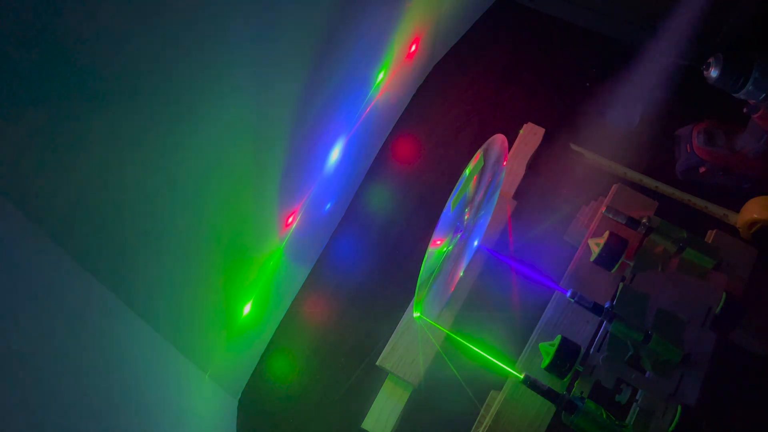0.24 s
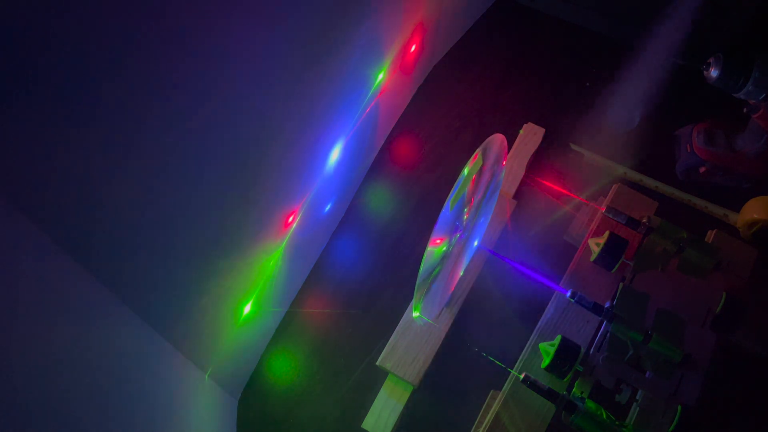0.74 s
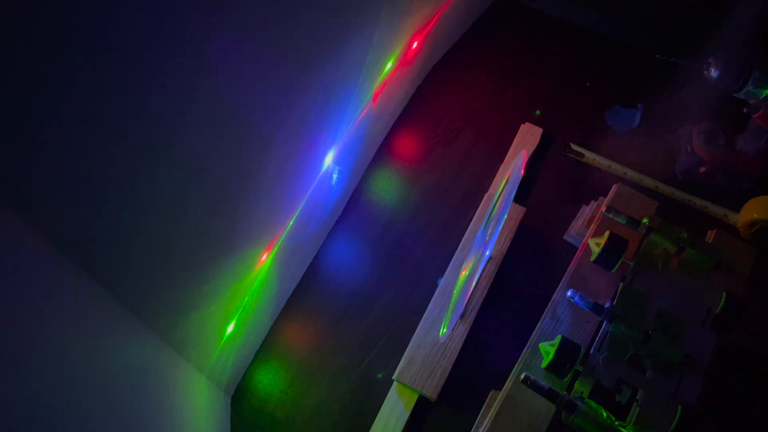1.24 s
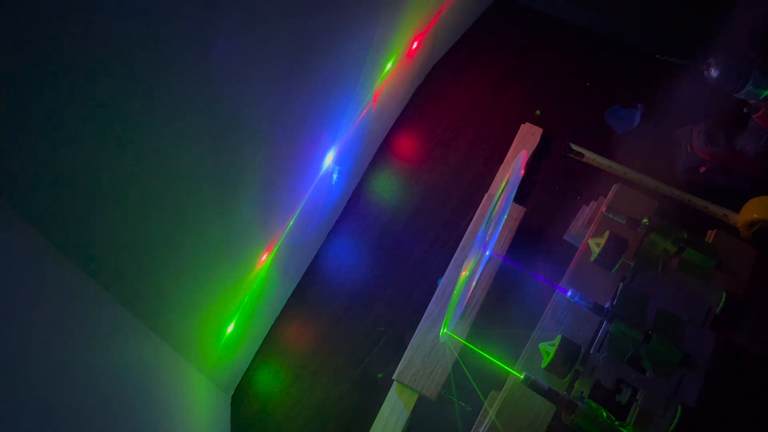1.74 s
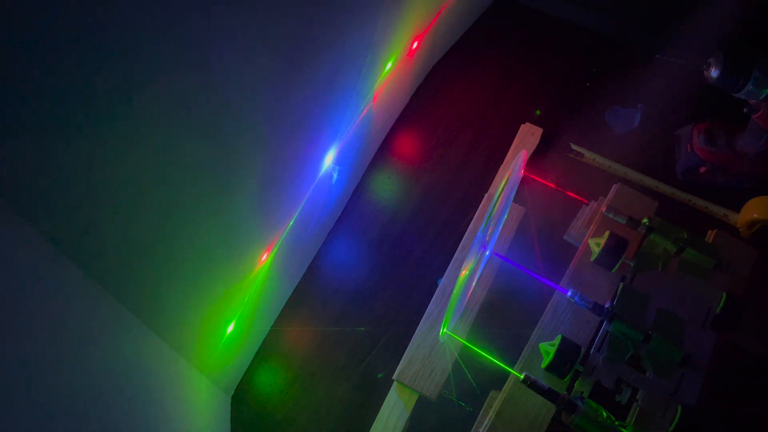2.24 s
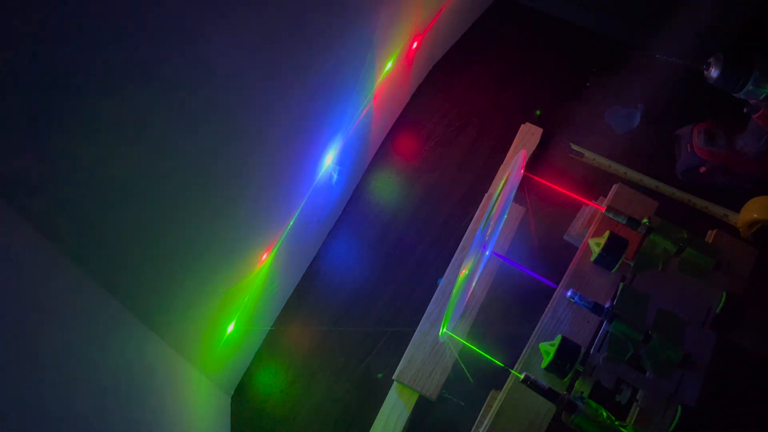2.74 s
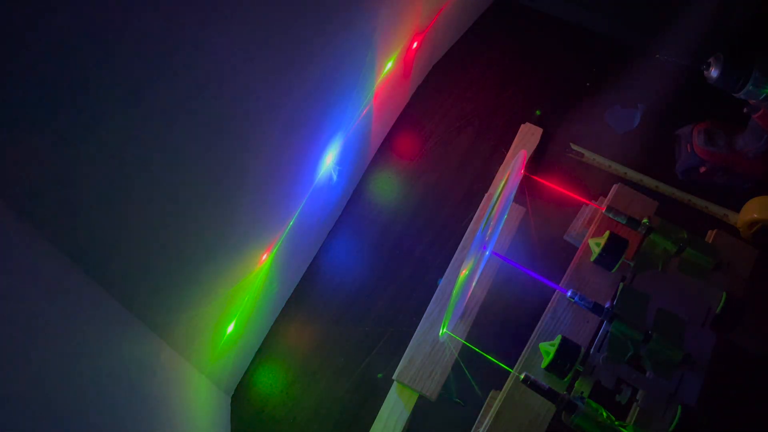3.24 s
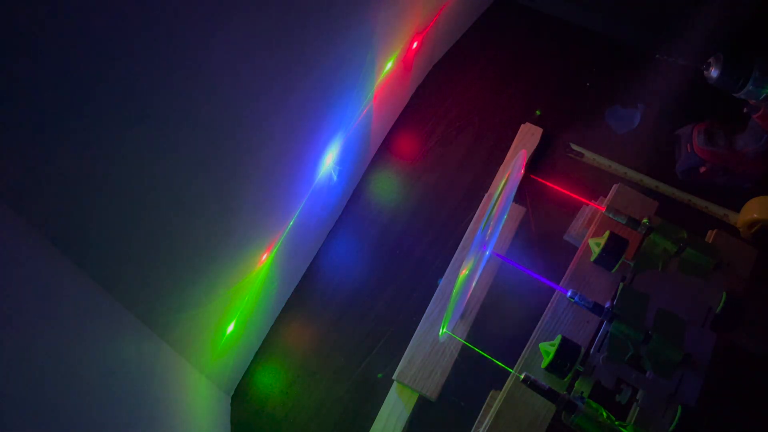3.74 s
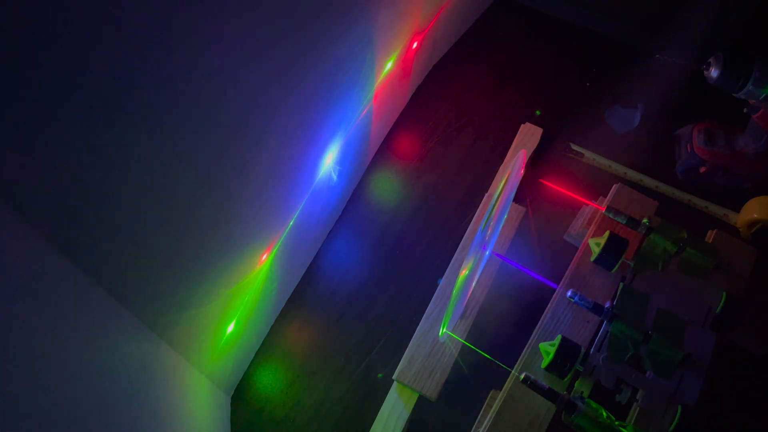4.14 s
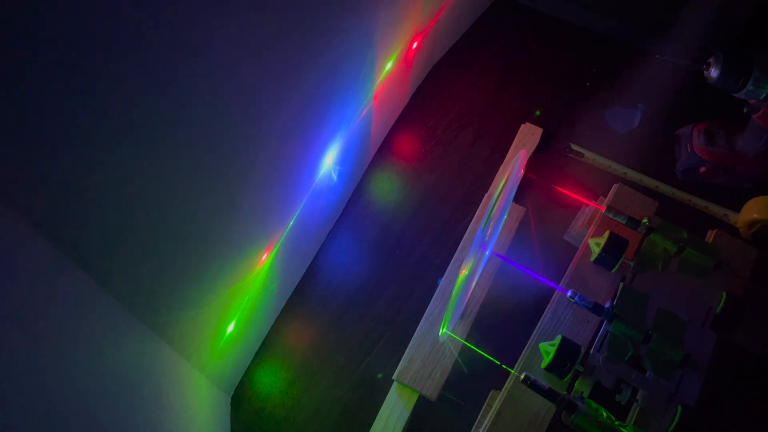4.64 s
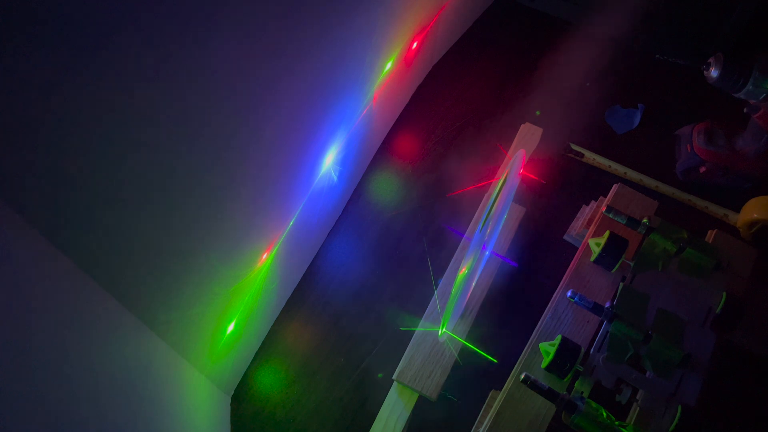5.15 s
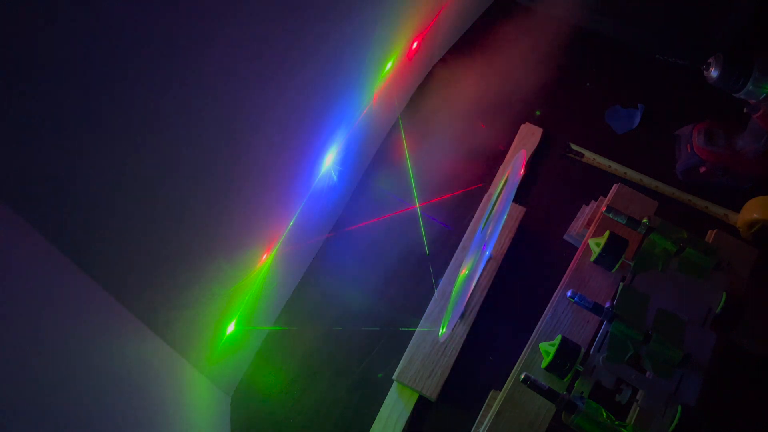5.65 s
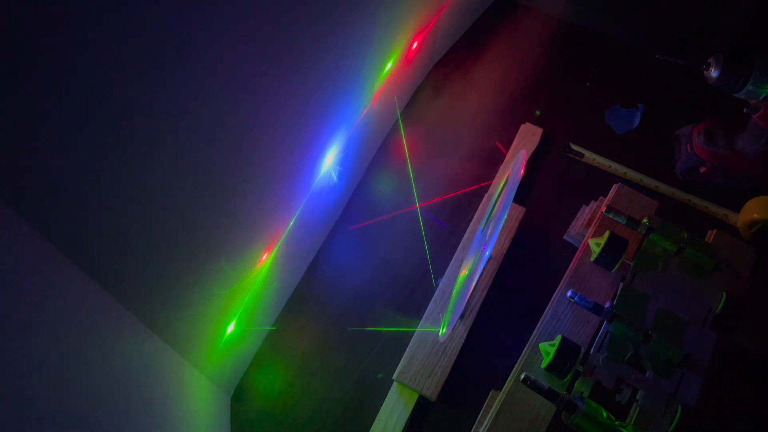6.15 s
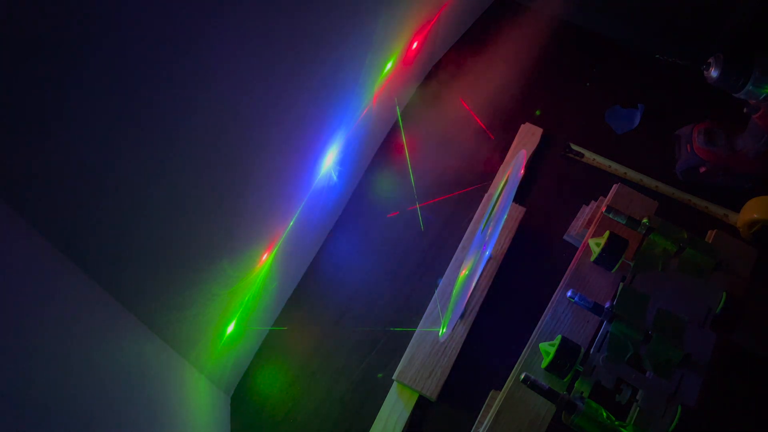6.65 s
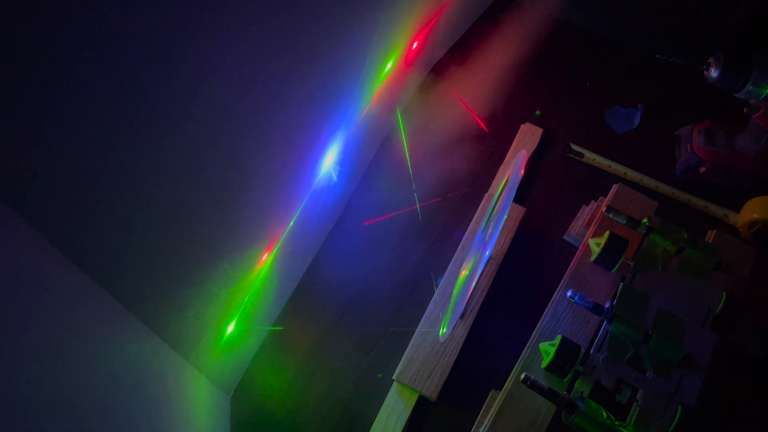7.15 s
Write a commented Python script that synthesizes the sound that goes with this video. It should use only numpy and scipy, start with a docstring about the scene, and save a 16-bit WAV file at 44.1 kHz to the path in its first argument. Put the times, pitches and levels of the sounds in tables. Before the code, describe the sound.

Close, steady steam jet with airy high hiss and soft fluttering rush, a few early low puffs, one sudden dip, faint hum behind.

```python
"""Quiet room, close by: a handheld steamer blows across a wooden rig.
Nozzle: wet filtered-noise hiss, half whistle. Plume: rush and low buffeting on shared eddies.
Moving ridges, random fine ripple and two short echoes colour the jet; blocks and brushes shift it.
Early puffs (sagging sine cycles) thump; the whole sound dips once and swells back.
Behind: filtered room noise and a faint beating hum of steady sines.
"""
import sys
import numpy as np
from scipy import signal
from scipy.fft import rfft, irfft
from scipy.io import wavfile
from scipy.ndimage import uniform_filter1d, map_coordinates

SR = 44100
rng = np.random.default_rng(int(sys.argv[2]) if len(sys.argv) > 2 else 0)


def output_pcm(signal):
    """Save a mono or channel-first signal as 16-bit PCM at the path in sys.argv[1].

    Samples are clipped to [-1, 1] before scaling.
    """
    pcm = np.clip(np.atleast_2d(signal).T, -1, 1) * 32767
    wavfile.write(sys.argv[1], SR, np.round(pcm).astype(np.int16))


N = 326781
T = np.arange(N) / SR  # s
HZ = np.maximum(np.arange(N // 2 + 1) * SR / N, 1)

# Slow course of the jet: t/s, jet level/dB, whistle re jet/dB before trim
FLOW = [(0, -22, 2.5), (.25, -18.5, -1), (.65, -20, 1), (1.2, -20.5, 1), (1.23, -20.5, -8),
        (1.33, -20.5, -5), (1.57, -21, -4.5), (1.72, -20, -3), (1.95, -20, -3), (2.95, -23, 0.5),
        (3.5, -22.5, -0.5), (4.47, -23, -2), (4.95, -22, -1.5), (5.2, -22, -6.5), (5.33, -20, -5.5),
        (5.55, -19, -3), (5.9, -18.5, -1.5), (6.2, -21, -3), (6.7, -22, -3), (7.2, -18.5, -27),
        (7.4, -18, -20)]
# Obstructed jet, hiss muffled, low gust thrown off: start/s, length/s, nominal hiss loss/dB, gust/dB
BLOCKS = [(.015, 0.1, 5, 5.5), (.367, 0.078, 5.5, 3), (.763, 0.042, 9, 1), (.81, 0.1, 4.5, 5),
          (.922, 0.0086, 8, 3), (.997, 0.013, 6.5, 3.5)]
BLOCK_ATTACK_S, BLOCK_RELEASE_S = .003, .058
GUST_ATTACK_S, GUST_RELEASE_S = .02, .079
BLOCK_RUSH_SHARE, BLOCK_WHISTLE_SHARE = .79, .51  # dB lost per dB of hiss lost; whistle: extra
# Jet brushing the rig: start/s, length/s, nominal rush rise/dB
BRUSHES = [(.02, 0.017, 5.5), (.8, 0.019, 4.5), (1.2, 0.084, 1.5), (1.95, 0.28, 3), (2.24, 0.45, 3.5),
           (3.13, 0.21, 6), (3.38, 0.11, 4.5), (3.71, 0.053, 4), (4.0, 0.069, 4.5), (4.21, 0.077, 5.5),
           (4.55, 0.17, 6), (4.8, 0.038, 6.5), (5.07, 0.27, 4.5), (5.37, 0.28, 5), (5.74, 0.089, 6),
           (6.3, 0.1, 7), (6.775, 0.27, 6.5), (7.12, 0.21, 4)]
BRUSH_ATTACK_S, BRUSH_RELEASE_S = .031, .19
BRUSH_HISS_SHARE, BRUSH_BUFFET_SHARE = .26, .75  # dB gained per dB of rush

# Fine eddies at the nozzle: f/Hz, relative density/dB
HISS_SPECTRUM = [(2200, -42), (3500, -14.8), (5000, -7.5), (5800, -4.4), (7300, -1.2), (7900, -1.2),
                 (9200, .6), (10500, -.7), (11900, -3.4), (12500, -10.1), (13200, -14.5), (14200, -20),
                 (15500, -20)]
WHISTLE_HZ, WHISTLE_WIDTH_HZ = 10670, 1300

# Spreading jet on the rig: f/Hz, relative density/dB
RUSH_SPECTRUM = [(800, -30), (1200, -57), (1750, -8.5), (2300, 0.05), (3000, 1), (4000, 3.5), (4900, 2),
                 (6500, 4), (11000, -42)]
# Large eddies where the jet lands: f/Hz, relative density/dB
BUFFET_SPECTRUM = [(60, -35), (100, -0.5), (140, -3), (260, -12.5), (340, -10), (520, 0.5), (630, 2.5),
                   (830, -3), (1050, 0.5), (1300, 2.5), (1550, 3.5), (2400, 0.5), (4000, -36)]
# Free plume, one row per aim: rush level/dB, buffeting level/dB, re jet before trim
PLUME_LEVELS = [(-13, -23), (-13.5, -23.5), (-15.5, -27.5), (-17.5, -26), (-20.5, -28)]

# Thump of air and its hollow body: f/Hz, width/Hz, relative level/dB
THUMP_BANDS = [(145, 83, -3), (440, 160, -9)]
THUMP_DB = -30  # re jet, at gust gain 2

# Nozzle hold and extra paths to two near surfaces: t/s, aim 0-4, echo 1/ms, echo 2/ms
AIM = [(0, 0, .44, .68), (.7, 0, .46, .71), (.88, 0, .43, .67), (1.08, 1, .4, .63), (1.205, 1, .385, .61),
       (1.22, 2, .495, .765), (1.8, 2, .49, .755), (2.3, 2, .43, .73), (4.62, 2, .43, .73),
       (4.83, 3, .405, .66), (5.1, 3, .387, .605), (5.32, 4, .386, .604), (7.4, 4, .373, .588)]
# Reflection of each near surface: signed gain
ECHO_GAINS = [.15, -.15]
# Ridges and hollows of the jet's colour, one table per aim: f/Hz, width/Hz, level/dB
FIRST_AIM_RIDGES = [(500, 150, 4.8), (760, 150, -3.3), (1020, 150, 3.6), (1340, 150, -2.0),
                    (1760, 150, -3.5), (2200, 600, -3), (3040, 450, 2.1), (3760, 220, -2.2),
                    (4400, 700, -4.6), (5320, 220, 2.5), (5780, 320, -5), (6200, 300, 3.5), (6650, 220, -1),
                    (7300, 700, 3), (8080, 220, 2.4), (10000, 1100, 4.0), (11960, 1100, -2.5)]
# Same for aim 1: f/Hz, width/Hz, level/dB
SECOND_AIM_RIDGES = [(380, 220, 6.1), (680, 100, -4), (1240, 150, -2.8), (1700, 320, -5.8),
                     (2300, 400, -3.5), (4320, 320, -5), (4750, 300, 4.5), (5450, 450, 4.5),
                     (6550, 600, -4.5), (7400, 700, -2), (9500, 1300, 6.5), (10240, 220, -6.0),
                     (10760, 220, -3.6), (13360, 1700, 3.6)]
# Same for aim 2: f/Hz, width/Hz, level/dB
THIRD_AIM_RIDGES = [(650, 200, 3), (1060, 120, 2), (1380, 400, -1.0), (1720, 100, -3.2), (2080, 100, -2.6),
                    (2740, 220, -2.2), (3100, 150, 1.6), (3680, 240, 3.3), (4150, 320, -2.8),
                    (4450, 300, -1.5), (4780, 150, 1.5), (5160, 200, 2.2), (5450, 300, -2.5),
                    (6100, 320, -2.8), (6550, 400, 2.2), (7300, 900, 2.4), (7780, 260, -3.2),
                    (8500, 600, 2), (9300, 600, 3.8), (10920, 450, -1.7), (12100, 700, 1.6),
                    (13360, 320, 2.1)]
# Same for aim 3: f/Hz, width/Hz, level/dB
FOURTH_AIM_RIDGES = [(1320, 100, -3.3), (1900, 200, 7.0), (2320, 100, 5.0), (2400, 700, -4.5),
                     (2720, 150, 4.2), (3280, 150, 3), (3900, 300, 6.5), (5000, 220, 3.5), (5550, 300, 4),
                     (6150, 350, -2.5), (6650, 300, 4), (7400, 700, 1.5), (8160, 220, 2.3),
                     (9560, 1100, 6.3), (11400, 600, -3), (13600, 1700, 3)]
# Same for aim 4: f/Hz, width/Hz, level/dB
FIFTH_AIM_RIDGES = [(480, 220, -2.0), (780, 120, 3.7), (1000, 150, -3.8), (1200, 100, 2.6), (1460, 220, 3),
                    (2250, 320, 1), (2880, 220, -4), (3550, 700, -3.2), (4340, 260, 4.2), (4980, 320, -3.8),
                    (5620, 450, 1.5), (6680, 700, 3.0), (7760, 320, -1.9), (10000, 700, 3.2),
                    (11480, 700, 1.3), (13360, 1700, -2.5)]
# Ridge glide as the nozzle nears or leaves the rig: t/s, frequency factor
GLIDE = [(0, 1), (.7, 1), (.85, .98), (1, .98), (1.205, 1.01), (1.22, .91), (1.7, .91), (2.1, .925),
         (2.4, 1), (5.15, 1), (5.3, .98), (6, 1), (7.1, 1.03), (7.4, 1.01)]
HAND_SWAY = .003  # rms fraction of frequency
# Resonance between nozzle and rig, higher as the gap narrows: t/s, f/Hz, level/dB
GAP = [(0, 2270, 6), (.12, 2280, 6), (.35, 2580, 6), (.7, 2580, 6.5), (.84, 2330, 6.5), (1, 2330, 6),
       (1.15, 2560, 4), (1.22, 2170, 4), (2.1, 2170, 3), (2.5, 2380, 1.2), (2.9, 2380, -.5),
       (3.3, 2380, 1.2), (4, 2400, 0), (5.3, 2350, -1)]
GAP_WIDTH_HZ = 350
RIPPLE_DB, RIPPLE_FROM_HZ = 2.1, 250  # high-frequency rms; half of it at RIPPLE_FROM_HZ
RIPPLE_DRIFT, RIPPLE_RATE_HZ = 1.3, 4

# Single puffs of air: start/s, envelope peak/dB
PUFFS = [(.046, -36), (.388, -45), (.838, -40), (.885, -46)]
PUFF_HZ, PUFF_SAG_HZ_PER_S, PUFF_RISE_S = 140, 500, .0096

# Still room: f/Hz, relative density/dB
ROOM_SPECTRUM = [(20, -14), (38, -16), (55, 6), (80, 1.5), (100, -4.5), (150, -1.5), (220, -1), (330, -5.5),
                 (1000, -13), (4000, -20), (15000, -40)]
ROOM_DB = -57.5
# Motor just under mains speed, its second line beating with mains hum:
# f/Hz, level before swell/dB rms, waver/dB rms
HUM_LINES = [(59.3, -56, .5), (118.6, -63, 1), (120.03, -65.5, 1)]
HUM_CREST_S = .2  # lines in phase here, but for their phase wander
# Slow swell of the hum: t/s, level/dB
HUM_SWELL = [(0, -6.5), (2.6, -1.5), (5.5, 0.5), (7.4, -2)]

# Stereo width by frequency: f/Hz, right lag/ms, left-right likeness 0-1, left minus right/dB
STEREO = [(100, 0, .99, 0), (450, 0, .75, -.7), (1000, 0, .8, 0), (1500, 0, .98, 0), (1950, 0, .998, 0),
          (2200, 0, .985, 0), (3000, .03, .5, -1), (3800, .03, .6, -1.5), (4600, .09, .45, -4),
          (5550, .168, .87, 0), (5900, .168, .98, 0), (6400, .17, .86, -.4), (7500, .172, .8, -1),
          (8100, .17, .88, -.4), (8500, .173, .99, 0), (9000, .167, .9995, 0), (9550, .159, .999, 0),
          (10000, .16, .93, 0), (11700, .16, .89, 0), (12350, .161, .995, 0), (13000, .156, .99, 0),
          (15500, .11, .8, 0)]
DIP_S, DIP_DB, DIP_FALL_S, DIP_RETURN_S = 1.205, -16, .005, .014
RECOVER_DB, RECOVER_S = -6.5, .62  # adds to the dip
TOP_HZ = 15500


def jet():
    """Blocking trades hiss for buffeting; brushing raises the rush, hiss and buffeting less."""
    flow_db, whistle_db = over_time(FLOW)
    blocked_db, _ = events_db(BLOCKS, BLOCK_ATTACK_S, BLOCK_RELEASE_S)
    _, gust_db = events_db(BLOCKS, GUST_ATTACK_S, GUST_RELEASE_S)
    brushed_db, = events_db(BRUSHES, BRUSH_ATTACK_S, BRUSH_RELEASE_S)
    aim = over_time(AIM)[0]
    rush_db, buffet_db = (np.interp(aim, np.arange(len(PLUME_LEVELS)), db)
                          for db in np.transpose(PLUME_LEVELS))
    lift_db = BRUSH_HISS_SHARE * brushed_db
    # lift cancels in the whistle
    near = nozzle(whistle_db - lift_db - BLOCK_WHISTLE_SHARE * blocked_db)
    near = near * undb(lift_db - blocked_db)
    rush_db = rush_db + brushed_db - BLOCK_RUSH_SHARE * blocked_db
    buffet_db = buffet_db + BRUSH_BUFFET_SHARE * brushed_db + gust_db
    return undb(flow_db) * (near + plume(rush_db, buffet_db) + thump(gust_db))


def nozzle(whistle_db):
    """Wet hiss and a broad nozzle resonance; both flutter with the flow."""
    wet_steam = noise() + undb(-11.5) * droplets(rate_hz=1200, spread_db=5.0)
    hiss = colour(wet_steam, undb(over_hz(HISS_SPECTRUM)[0])) * undb(.5 * walk(45))
    resonance = 1 / (1 + (2 * (HZ - WHISTLE_HZ) / WHISTLE_WIDTH_HZ) ** 2)
    whistle = colour(noise(), resonance) * undb(whistle_db + .48 * walk(28))
    flutter = undb(.83 * walk(21.39))
    return (undb(-3.0) * hiss + undb(-.5) * whistle) * flutter


def droplets(rate_hz, spread_db):
    """Specks of condensed water torn off the nozzle: many small, a few large."""
    hit = rng.random(N) < rate_hz / SR
    size = undb(spread_db * np.minimum(rng.exponential(size=N), 3.3))
    return unit(noise() * hit * size)


def plume(rush_db, buffet_db):
    """Jet further out: rush and low buffeting sharing the same eddies."""
    eddies = walk(19)
    rush = colour(noise(), undb(over_hz(RUSH_SPECTRUM)[0])) * undb(rush_db + 1.13 * eddies)
    buffet = colour(noise(), undb(over_hz(BUFFET_SPECTRUM)[0])) * undb(buffet_db + .87 * eddies)
    return undb(2.0) * rush + undb(-1.3) * buffet


def thump(gust_db):
    """Soft low thump of air with a hollow body, only while a gust lasts."""
    band = sum(undb(db) / (1 + (2 * (HZ - hz) / width_hz) ** 2) for hz, width_hz, db in THUMP_BANDS)
    highpass = HZ / (HZ + THUMP_BANDS[0][0])
    return colour(noise(), band * highpass) * undb(THUMP_DB) * (undb(gust_db) - 1)


def aimed(x, size=1024):
    """Short-time filter: colour follows the aim; ridges glide as the hand moves and sways."""
    overlap = size - size // 4
    _, s, frames = signal.stft(x, SR, nperseg=size, noverlap=overlap)
    hz = np.arange(size // 2 + 1)[:, None] * SR / size
    aim = np.interp(s, T, over_time(AIM)[0])
    stretch = np.interp(s, T, over_time(GLIDE)[0] * (1 + HAND_SWAY * walk(3.0)))
    aims = [FIRST_AIM_RIDGES, SECOND_AIM_RIDGES, THIRD_AIM_RIDGES, FOURTH_AIM_RIDGES, FIFTH_AIM_RIDGES]
    db = 0
    for k, ridges in enumerate(aims):
        share = np.maximum(1 - np.abs(aim - k), 0)  # crossfade between neighbours
        db = db + share * tint(ridges, hz / stretch)
    gap_hz, gap_db = (np.interp(s, T, column) for column in over_time(GAP))
    db = db + gap_db * bell(hz, gap_hz, GAP_WIDTH_HZ) + ripple(hz / stretch, s)
    return signal.istft(frames * undb(db), SR, nperseg=size, noverlap=overlap)[1][:, :N]


def tint(ridges, hz):
    """Ridges and hollows of one aim, in dB per frequency."""
    grid_hz = HZ[::20]
    grid_db = sum(db * bell(grid_hz, centre_hz, width_hz) for centre_hz, width_hz, db in ridges)
    return np.interp(hz, grid_hz, grid_db)


def bell(hz, centre_hz, width_hz):
    """Ridge of height 1, given width at half height."""
    return .5 ** ((2 * (hz - centre_hz) / width_hz) ** 2)


def ripple(hz, s, count=14):
    """Random fine ripple in dB over frequency, each cosine's strength drifting slowly."""
    periods_per_hz = rng.uniform(.0015, .008, count)
    total = 0
    for rate in periods_per_hz:
        strength = rng.choice([-1, 1]) + RIPPLE_DRIFT * np.interp(s, T, walk(RIPPLE_RATE_HZ))
        total = total + strength * np.cos(2 * np.pi * hz * rate)
    return RIPPLE_DB * unit(total) * hz / (hz + RIPPLE_FROM_HZ)


def surfaces(x):
    """Two short reflections comb the steam; the comb slides as the nozzle moves."""
    out = x
    for gain, delay_ms in zip(ECHO_GAINS, over_time(AIM)[1:]):
        place = (T - delay_ms / 1000) * SR  # fractional sample read
        out = out + gain * np.array([map_coordinates(row, [place], order=3) for row in x])
    return out


def puffs():
    """A few low cycles per puff: swell, sag in pitch, die away."""
    out = np.zeros(N)
    for start_s, db in PUFFS:
        age_s = np.maximum(T - start_s, 0)
        rise = age_s / PUFF_RISE_S
        envelope = (rise * np.exp(1 - rise)) ** 2
        cycles = age_s * (PUFF_HZ - PUFF_SAG_HZ_PER_S * age_s / 2)
        out += undb(db) * envelope * np.sin(2 * np.pi * cycles)
    return out


def room():
    """Low room noise plus slowly beating hum lines; the hum has no side part."""
    lines = 0
    for hz, db, waver_db in HUM_LINES:
        phase = 2 * np.pi * hz * (T - HUM_CREST_S) + .098 * walk(2.66)
        lines = lines + np.sin(phase) * undb(db + waver_db * walk(2.97))
    hum = np.sqrt(2) * lines * undb(over_time(HUM_SWELL)[0])
    air = undb(ROOM_DB) * colour(noise(), undb(over_hz(ROOM_SPECTRUM)[0]))
    return air + hum * np.array([[1], [0]])


def stereo(x):
    """Left and right by frequency: lag, likeness, balance; they nearly cancel near 9 kHz."""
    lag_ms, likeness, balance_db = over_hz(STEREO)
    likeness = np.clip(likeness, 0, 1)
    middle, side = rfft(x)
    sign = np.array([[1], [-1]])  # left, right
    both = middle * np.sqrt((1 + likeness) / 2) + sign * side * np.sqrt((1 - likeness) / 2)
    turn = np.exp(1j * np.pi * sign * HZ * lag_ms / 1000)  # half the lag each way
    return irfft(both * turn * undb(sign * balance_db / 2), N)


def dip():
    """Gain of the whole sound: sudden deep dip, fast partial return, then a swell."""
    fall = np.interp(T, [DIP_S, DIP_S + DIP_FALL_S], [0, 1])
    back = np.exp(-np.maximum(T - DIP_S - DIP_FALL_S, 0) / DIP_RETURN_S)
    low_db = RECOVER_DB * held(DIP_S, DIP_FALL_S, DIP_FALL_S, RECOVER_S)
    return undb(DIP_DB * fall * back + low_db)


def held(start_s, length_s, attack_s, release_s):
    """Event envelope: linear rise, hold to the end of length, linear fall; peaks below 1 if short."""
    rise = (T - start_s) / attack_s
    fall = 1 - (T - start_s - length_s) / release_s
    return np.clip(np.minimum(rise, fall), 0, 1)


def events_db(table, attack_s, release_s):
    """One dB curve per depth column; the strongest counts where events overlap."""
    return np.max([np.outer(depths_db, held(start_s, length_s, attack_s, release_s))
                   for start_s, length_s, *depths_db in table], axis=0)


def noise():
    """Two unrelated noises: stereo middle and side."""
    return rng.standard_normal((2, N))


def walk(rate_hz):
    """Random levels held 1 / rate_hz, slewed twice; rms near 1."""
    k = max(int(SR / rate_hz), 1)
    steps = np.repeat(rng.standard_normal(N // k + 1), k)
    return unit(uniform_filter1d(uniform_filter1d(steps, k), k)[:N])


def colour(x, gain):
    """Filter by a gain per frequency; rms 1 out."""
    return unit(irfft(rfft(x) * gain, N))


def unit(x):
    """Scale to rms 1."""
    return x / np.sqrt(np.mean(x ** 2))


def undb(db):
    """dB to gain."""
    return 10 ** (np.asarray(db) / 20)


def over_time(table):
    """Table columns at every sample."""
    s, *columns = np.transpose(table)
    return [np.interp(T, s, c) for c in columns]


def over_hz(table):
    """Table columns at every frequency, interpolated over log f."""
    hz, *columns = np.transpose(table)
    return [np.interp(np.log(HZ), np.log(hz), c) for c in columns]


def scene():
    """Jet among near surfaces, over the room; puffs equal left and right; one dip over all."""
    steam = surfaces(aimed(jet()))
    return (stereo(steam + room()) + puffs()) * dip()


def record(dry):
    """Phone low-pass: steep elliptic cut at TOP_HZ."""
    return signal.sosfilt(signal.ellip(10, .1, 80, TOP_HZ, fs=SR, output="sos"), dry)


dry = scene()
out = record(dry)
output_pcm(out)
```